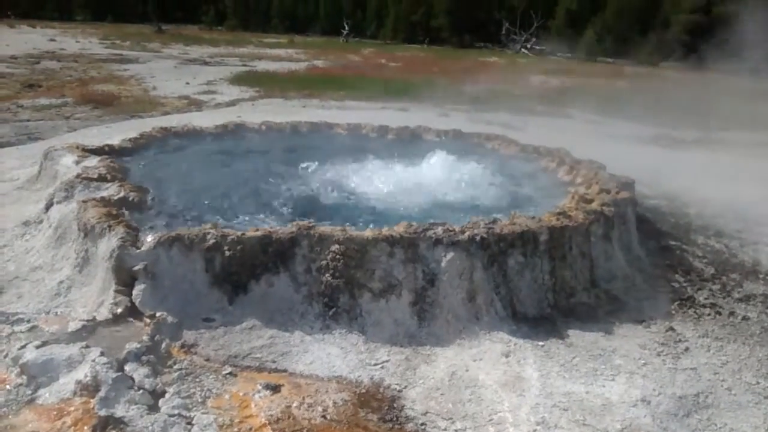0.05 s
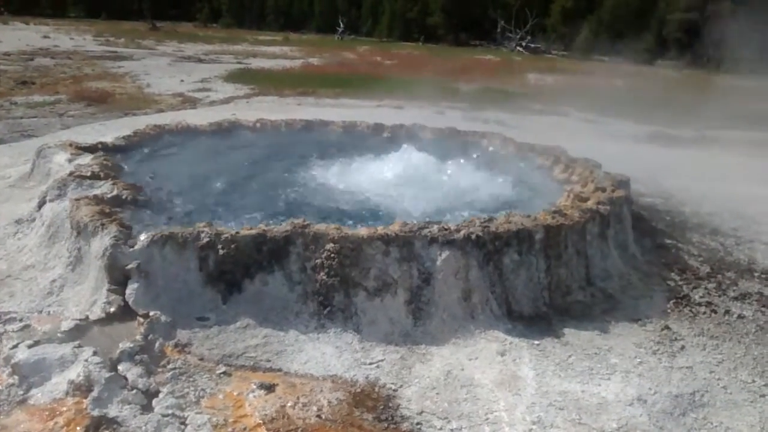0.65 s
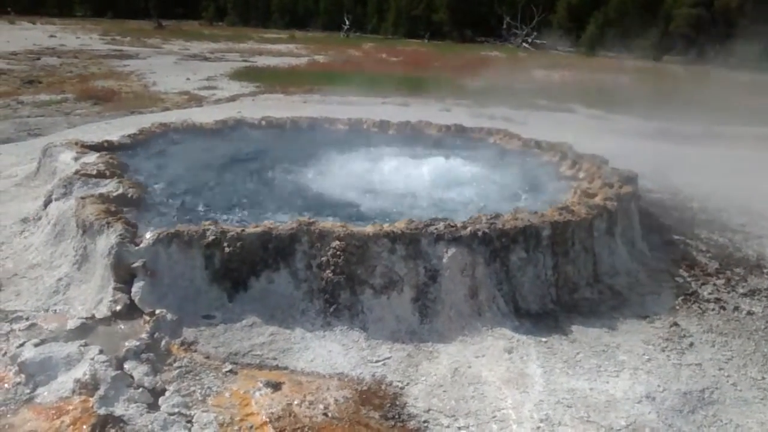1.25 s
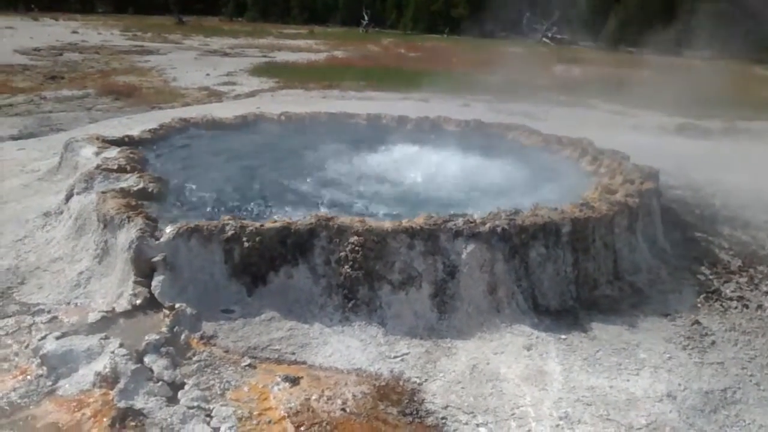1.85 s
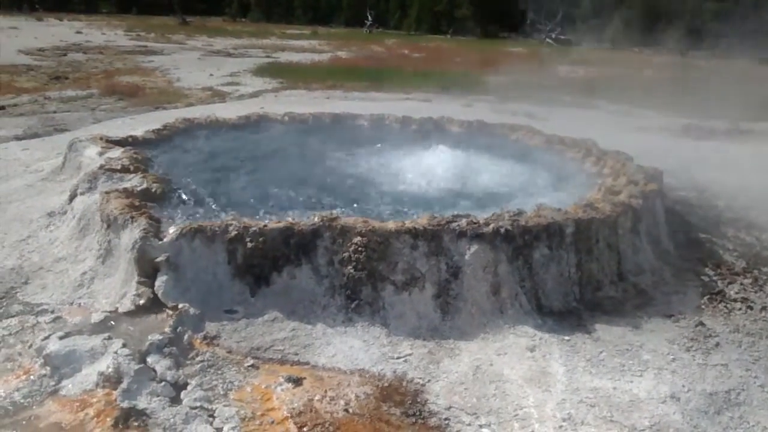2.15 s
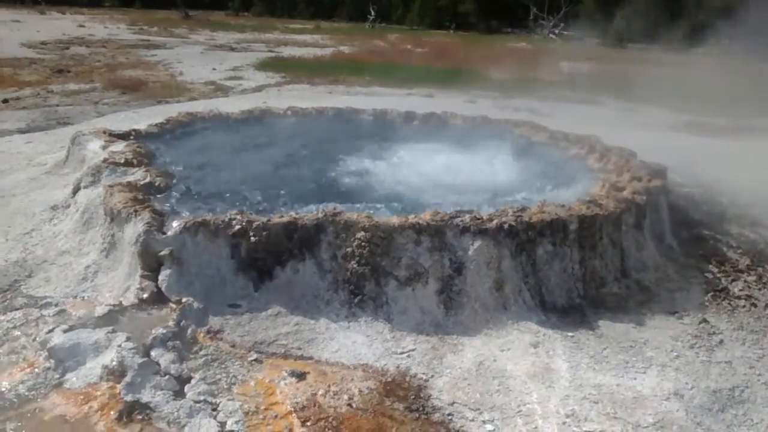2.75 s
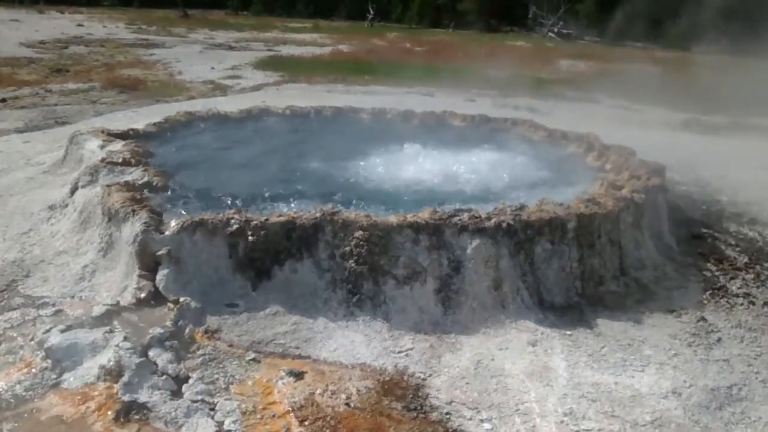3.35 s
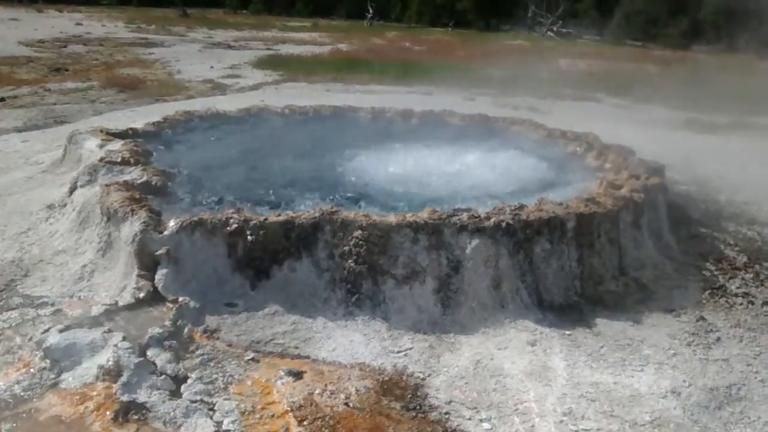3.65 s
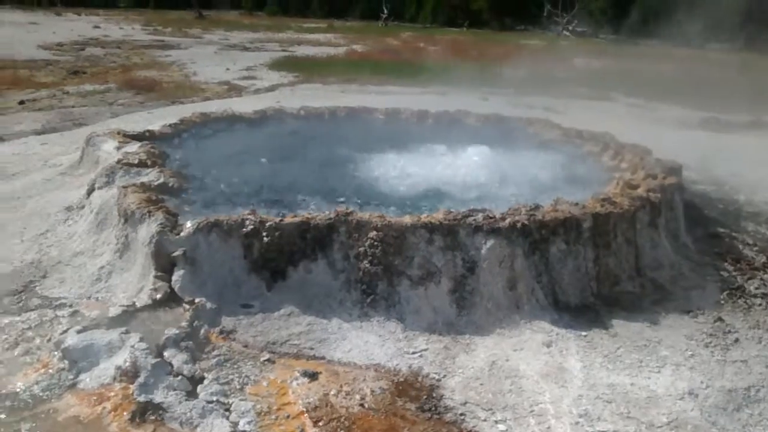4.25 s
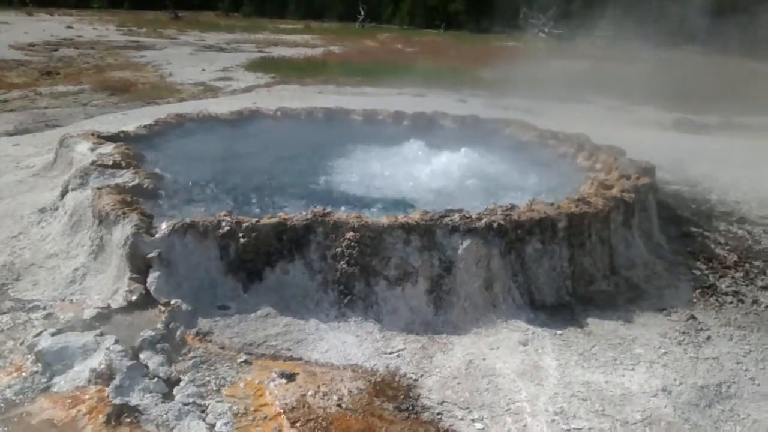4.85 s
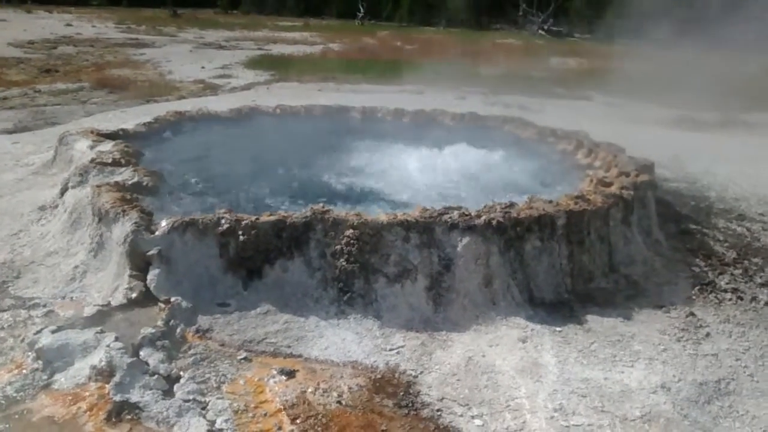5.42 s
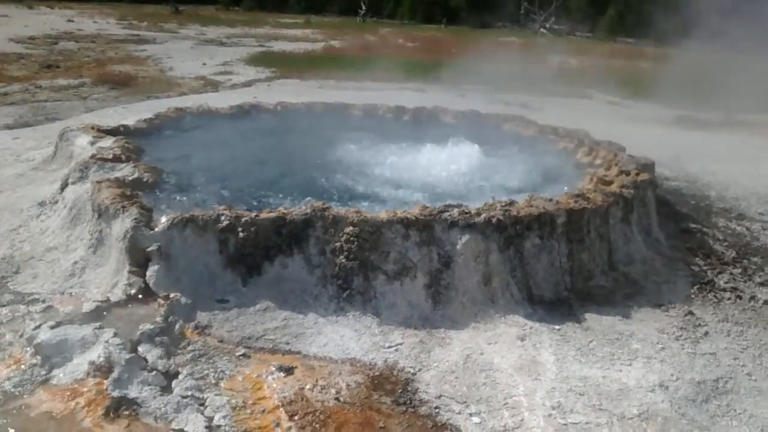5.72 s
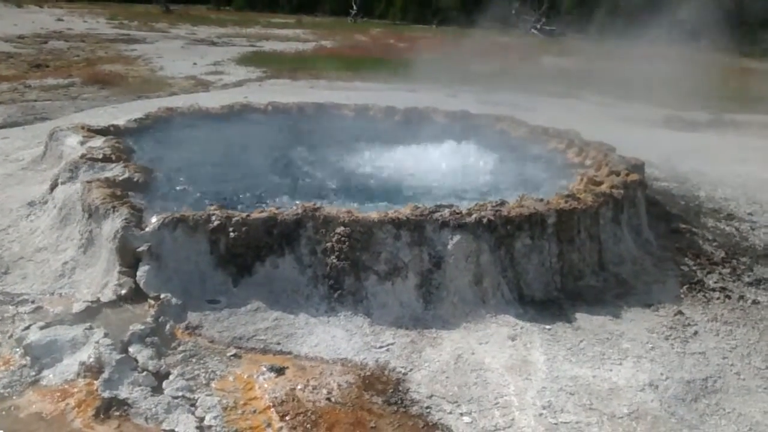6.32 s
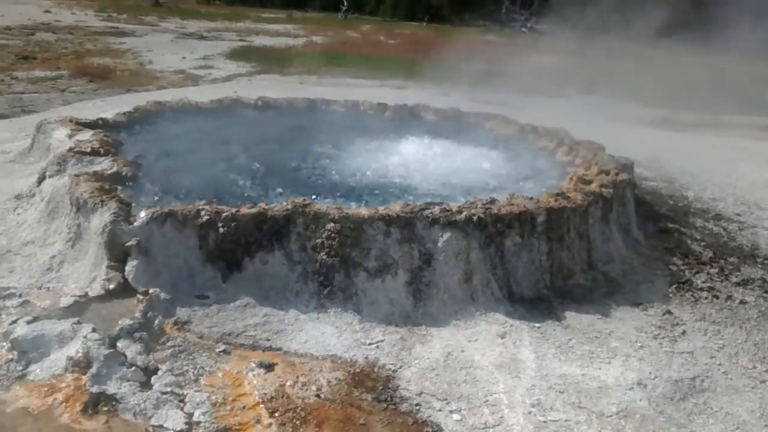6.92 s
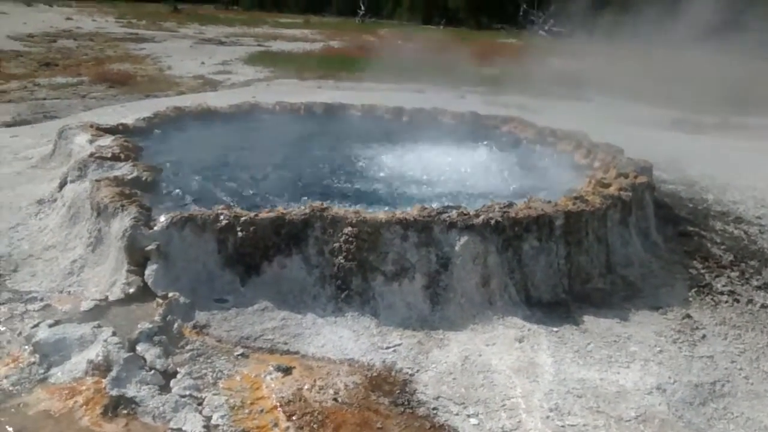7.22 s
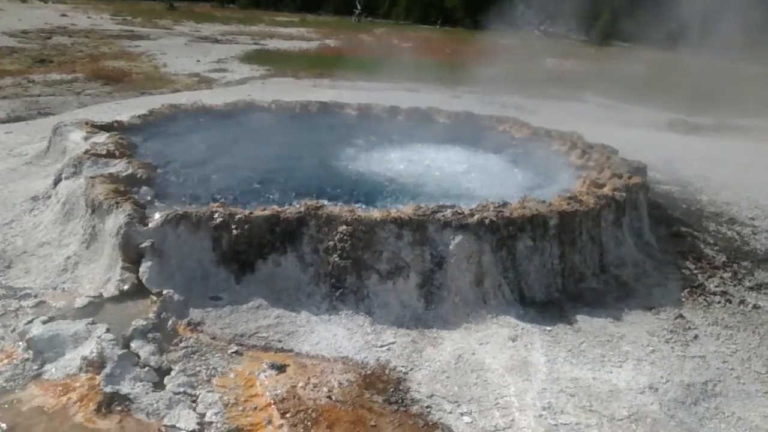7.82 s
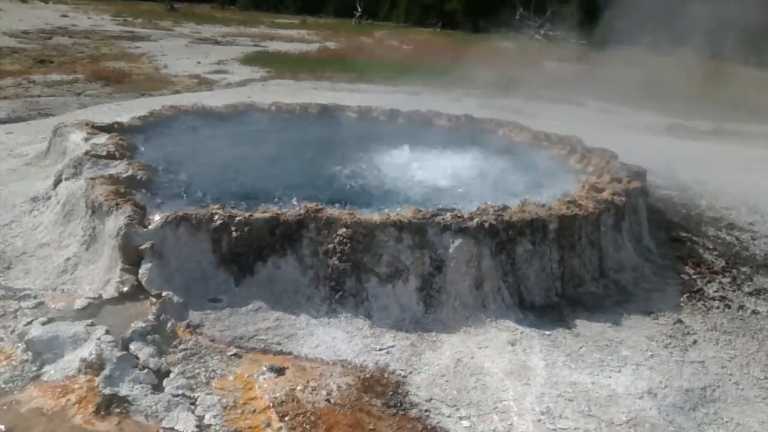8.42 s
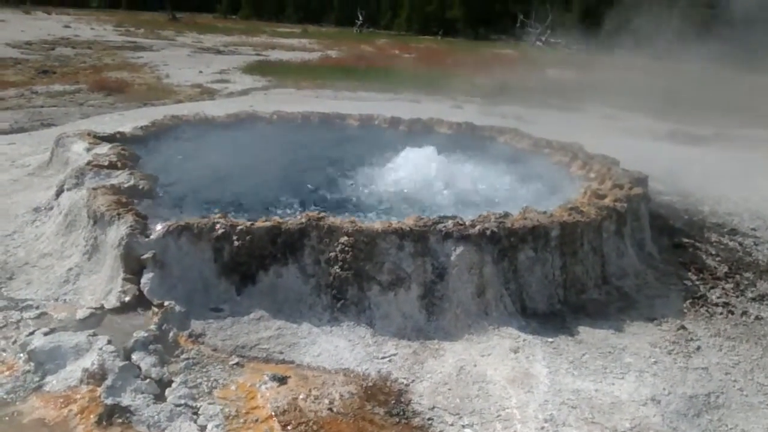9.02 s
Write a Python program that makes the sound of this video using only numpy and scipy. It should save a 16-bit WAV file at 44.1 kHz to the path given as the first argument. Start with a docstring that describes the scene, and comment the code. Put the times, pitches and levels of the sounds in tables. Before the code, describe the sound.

Wind buffets the microphone in low, ragged thumps over the churning and bubbling of a boiling pool.

```python
"""A hot spring boils in its stone basin: the water domes up, bubbles burst and spray falls back.
Wind buffets a small stereo microphone; widening gives it opposite sign in the two channels.
The hardest eddies trip the recorder's limiter, which ducks the water and lets it swell back.
A faint hiss lies underneath."""
import sys
import numpy as np
from scipy import signal
from scipy.fft import rfft, irfft, next_fast_len
from scipy.io import wavfile
from scipy.ndimage import uniform_filter1d, minimum_filter1d, map_coordinates

SR = 44100
rng = np.random.default_rng(int(sys.argv[2]) if len(sys.argv) > 2 else 0)


def generate_wav(sig):
    """Save sig (samples, or channels by samples) to the path in sys.argv[1] as 16-bit PCM at SR."""
    pcm = np.round(np.clip(np.atleast_2d(sig).T, -1, 1) * 32767).astype(np.int16)
    wavfile.write(sys.argv[1], SR, pcm)


N = 399987

# hard eddies on the microphone: time_s, strength_db, pitch_hz
EDDIES = [(.078, -12, 75), (0.091, 5, 89.5), (.473, -10, 108), (0.488, -4.5, 87), (.602, -12, 95),
          (0.851, -2, 92), (0.973, -9.5, 123), (1.405, 5, 60), (1.416, 1, 106), (1.577, -5.5, 97),
          (1.732, -0.5, 134), (1.777, -6, 101), (1.876, -11, 105), (1.906, -14, 100), (1.934, -2, 102),
          (2.141, -9.5, 96), (2.153, -2, 69.4), (2.322, -18, 135), (2.393, -6.5, 120), (2.483, -10.5, 101),
          (2.547, -11.5, 119), (2.613, 4, 54), (2.877, -6, 119), (3.693, -5.5, 79), (3.817, -13.5, 113),
          (3.86, -6, 109), (4.075, -10.5, 108), (4.159, -7, 110), (4.167, -6, 95), (4.194, 1, 125),
          (4.212, -9, 114), (4.664, -4.5, 125), (4.678, -11.5, 120), (4.749, -5, 84), (4.928, -5.5, 120),
          (4.951, -10, 120), (5.257, -1, 84), (5.331, -10, 105), (5.508, -8.5, 113), (5.65, -1.5, 131),
          (5.813, -7, 118), (5.826, -10, 109), (5.868, -2.5, 98), (5.94, -5.5, 104), (5.966, -2.5, 106),
          (6.07, -10, 119), (6.122, -10, 70), (6.147, 4, 58), (6.29, -9.5, 124), (6.346, -5, 124),
          (6.355, -8, 130), (6.58, -10, 109), (6.604, -2, 62), (6.613, 6.5, 76), (6.708, -10.5, 136),
          (6.923, -11, 130), (7.071, -15.5, 120), (7.29, -8.5, 120), (7.448, -12, 100), (7.466, -5.5, 95),
          (7.543, -8.5, 130), (7.571, -1, 122), (7.649, -14, 105), (7.664, -5.5, 100), (7.754, -5, 165),
          (7.765, -9, 70), (7.778, -3.5, 95), (7.815, -9, 120), (7.876, -10.5, 130), (7.899, -8.5, 174),
          (7.912, -4.5, 120), (7.927, -11, 100), (7.94, -0.5, 125), (7.95, -8.5, 110), (8.032, -9.5, 130),
          (8.069, -10.5, 159), (8.161, -4.5, 129), (8.177, -5, 120), (8.193, -10, 110), (8.215, 6, 116),
          (8.468, -4, 100), (8.539, -9, 105), (8.602, -10.5, 98), (8.625, -7.5, 110), (8.814, -5.5, 132),
          (8.839, -5, 120), (8.87, -7, 121), (8.979, -12.5, 120)]
# breeze under the gusts: time_s, relative_db
BREEZE = [(0.0, -48.5), (0.73, -38), (1.14, -51), (1.33, -39), (1.65, -41), (2.2, -40), (2.46, -33.5),
          (2.8, -44.5), (3.26, -55.5), (3.71, -38), (4.37, -40), (4.83, -38.5), (5.15, -35.5),
          (5.45, -46.5), (5.62, -33.5), (5.93, -35.5), (6.2, -36.5), (6.68, -42.5), (7.0, -41), (7.22, -42),
          (7.5, -34.5), (7.9, -37.5), (8.44, -38), (8.6, -32.5), (9.07, -42.5)]
SMALL_EDDY_HZ = 135


def amp(db):
    """Decibels to gain."""
    return 10 ** (np.asarray(db) / 20)


def unit(x):
    """Scale to rms 1."""
    return x / np.sqrt(np.mean(x ** 2) + 1e-20)


def along(points, hz):
    """Read (freq_hz, value) points on a log axis."""
    freq_hz, values = np.transpose(points)
    return np.interp(np.log(hz + 1), np.log(freq_hz + 1), values)


def wobble(knots_per_s):
    """Smooth random curve."""
    return map_coordinates(rng.standard_normal(4096), [np.arange(N) * knots_per_s / SR], mode="wrap")


def filtered(x, response):
    """Apply a complex frequency response."""
    size = next_fast_len(N + 8192)
    return irfft(rfft(x, size) * response(np.fft.rfftfreq(size, 1 / SR)), size)[..., :N]


def lowpass(x, cutoff_hz, order):
    """Zero-phase low-pass."""
    return filtered(x, lambda hz: 1 / (1 + (hz / cutoff_hz) ** order))


def coloured(x, spectrum):
    """Apply a (freq_hz, gain_db) spectrum."""
    return filtered(x, lambda hz: amp(along(spectrum, hz)))


def add(track, start_s, sound):
    """Mix a sound into a track."""
    i = max(0, round(start_s * SR))
    track[i:i + len(sound)] += sound[:max(0, len(track) - i)]


def swells(rows):
    """Summed power of bell-shaped swells: crest_s, peak_db, rise_s, fall_s."""
    power = np.zeros(N)
    for crest_s, db, rise_s, fall_s in rows:
        t = np.arange(max(-crest_s, -3 * rise_s), 3 * fall_s, 1 / SR)
        bell = np.exp(-(t / np.where(t < 0, rise_s, fall_s)) ** 2)
        add(power, crest_s + t[0], amp(db) ** 2 * bell)
    return power


def boil(simmer_churn_db=-46.5, simmer_spray_db=-60.5, rise_s=0.12):
    """Churn and spray levels in dB: surges over a steady simmer."""
    # the pool heaves and falls back: crest_s, churn_db, spray_db, settle_s
    surges = [(.02, -42, -58.5, .06), (.3, -45.5, -74, .05), (.74, -39.5, -52, 0.18),
              (1.07, -42, -58.5, 0.2), (1.38, -46.5, -63, 0.18), (2.5, -53.5, -61, 0.09),
              (2.95, -55, -63, .15), (3.46, -45.5, -58, 0.38), (3.75, -53, -61.5, 0.48),
              (4.15, -46.5, -61, 0.044), (4.61, -43, -54.5, 0.12), (5.06, -50, -58.5, 0.32),
              (5.68, -45, -57.5, 0.051), (5.9, -48.5, -55, 0.18), (7.22, -47, -72, 0.18),
              (8.3, -59, -72, 0.079), (8.55, -50.5, -64, 0.12), (8.9, -48.5, -59, 0.2)]
    churn = amp(simmer_churn_db) ** 2 + swells([(s, db, rise_s, fall_s) for s, db, _, fall_s in surges])
    spray = amp(simmer_spray_db) ** 2 + swells([(s, db, rise_s, fall_s) for s, _, db, fall_s in surges])
    return 10 * np.log10(churn), 10 * np.log10(spray)


def bubbles(count, low_hz, span_ratio, decay_cycles, spread_db, rise, samples):
    """Ringing bubbles; each note climbs as its bubble nears the surface."""
    when, pitch, life, strength = rng.random((count, 4)).T[:, :, None]
    hz = low_hz * (1 + (np.sqrt(span_ratio) - 1) * pitch) ** 2
    cycles = hz * np.arange(samples) / SR
    age = cycles / (decay_cycles * (.5 + life))
    gain = hz ** .75 * amp(-spread_db * np.log(np.maximum(strength, .02)))
    rings = gain * np.exp(-age) * np.sin(2 * np.pi * cycles * (1 + rise * np.minimum(age, 2)))
    index = (when * N).astype(int) + np.arange(samples)
    return unit(np.bincount(index.ravel(), rings.ravel(), N)[:N])


def froth(churn_db, spray_db):
    """Bursts and plops over a wash of small bubbles; churn drives the lows, spray the highs."""
    bursts = bubbles(9000, low_hz=393, span_ratio=22.2, decay_cycles=2.1,
                     spread_db=2.5, rise=0.053, samples=400)
    plops = bubbles(500, low_hz=527.5, span_ratio=4, decay_cycles=7.4,
                    spread_db=1, rise=0.0436, samples=1600)
    foam = rng.standard_normal(N)
    swarm = unit(bursts + amp(-14.5) * plops + amp(2.5) * foam)
    lows = lowpass(swarm, cutoff_hz=2650, order=14)
    churn = lows * amp(churn_db + 15 + 1.1 * wobble(45))
    spray = (swarm - lows) * amp(spray_db + 24.5 + 1.45 * wobble(30))
    return churn + spray


def spring(churn_db, spray_db):
    """Boiling water slightly off axis; the stone rim scatters part of its sound."""
    # water colour, mid and side: freq_hz, gain_db
    mid_colour = [(250, -2), (450, -7.5), (650, -1), (850, -3.5), (1150, -9), (1550, -8.5), (2050, -16),
                  (2300, -24.5), (2510, -40.5), (2680, -25.5), (3000, -21.5), (3520, -14), (3900, -20),
                  (4200, -23.5), (4550, -32), (5200, -26.5), (6400, -28), (14000, -67)]
    side_colour = [(100, -18), (600, -15.5), (1000, -22.5), (1350, -31), (1600, -21.5), (1850, -15),
                   (2200, -21.5), (2500, -26), (2850, -36), (3200, -23), (3900, -29), (4400, -26),
                   (6500, -37), (14000, -36)]
    # water balance: freq_hz, left_minus_right_db
    lean = [(1000, 1), (1400, -0.5), (1750, -1.5), (2150, 4.5), (2420, -6), (2540, 0), (2750, -2.5),
            (2950, -3.5), (3480, -5.5), (4000, -3), (5400, -4), (6600, 8.5), (10000, 17), (14000, 2)]
    direct, scattered = [froth(churn_db, spray_db) for _ in range(2)]
    mid = coloured(direct, mid_colour) + slaps()
    # the difference of two close capsules leads their sum by a quarter cycle
    difference = .5 * filtered(direct, lambda hz: 1j) + .87 * scattered
    side = coloured(difference, side_colour)
    stereo = np.array([mid + side, mid - side])
    return filtered(stereo, lambda hz: amp(np.outer([.5, -.5], along(lean, hz))))


def droplets(spray_db, base_db=-60.5, spurt_db=3.2, gain_db=-8.5):
    """Fine drops rain on the pool in spurts, louder when the spray is high."""
    drops = rng.standard_normal((2, N)) * amp(3.5 * wobble(300))
    fizz = unit(coloured(drops, [(3000, -30), (5200, 2.5), (7000, -3), (9000, -3), (14000, -22)]))
    spurts = unit(amp(spurt_db * wobble(28)))
    return fizz * spurts * amp((spray_db + base_db) / 2 + gain_db)


def hiss():
    """Faint steady noise, independent per channel."""
    # hiss colour: freq_hz, gain_db
    colour = [(100, -25), (2500, 8), (4500, 2.5), (9000, 0), (12000, 0.6), (15500, -0.5)]
    return amp([[-60.1], [-60.6]]) * coloured(rng.standard_normal((2, N)), colour)


def airflow(breeze_gain_db=16.5, sway_db=2.5):
    """Wind level in dB: swaying breeze, soft gusts and a rush peaking just before each hard eddy."""
    # soft gusts: crest_s, peak_db, half_length_s
    gusts = [(0.068, -16.5, 0.04), (0.23, -18, 0.022), (0.335, -16, 0.014), (.625, -15.5, 0.033),
             (0.757, -18.5, 0.027), (0.994, -22, 0.033), (1.23, -14, 0.039), (1.5, -15, 0.037),
             (1.907, -11.5, 0.031), (2.28, -20, 0.074), (2.59, -13, 0.013), (2.927, -17.5, 0.022),
             (3.225, -19.5, 0.031), (3.506, -21.5, 0.059), (3.647, -15, 0.014), (3.81, -15.5, 0.028),
             (4.433, -18.5, 0.021), (5.004, -19, 0.038), (5.21, -17.5, 0.019), (5.331, -18, 0.021),
             (6.256, -12.5, 0.032), (6.39, -17, 0.05), (6.818, -13.5, 0.037), (6.982, -18, 0.03),
             (7.087, -17, 0.02), (7.438, -7, 0.014), (7.648, -13, 0.041), (8.356, -13, 0.038),
             (8.56, -19, 0.055), (8.92, -16.5, 0.09)]
    breeze_db = np.interp(np.arange(N) / SR, *np.transpose(BREEZE))
    power = amp(breeze_db + breeze_gain_db + sway_db * wobble(14)) ** 2
    power += swells([(s, db, half_s, half_s) for s, db, half_s in gusts])
    lead_s, rise_s, fall_s = 0.0053, 0.02, 0.018
    power += swells([(s - lead_s, 0.7 * db - 19, rise_s, fall_s) for s, db, _ in EDDIES])
    return 10 * np.log10(power)


def turbulence(wind_db, lumps_db, split_hz, treble_db_per_db):
    """Whirls patter over a smooth roar; faster air sheds finer ones and sounds brighter."""
    # turbulence at the microphone: freq_hz, gain_db
    buffet = [(8, -8.5), (25, 8), (90, 3), (170, -4.5), (260, -12.5), (350, -22.5), (480, -29.5),
              (620, -49), (900, -51), (2000, -41)]
    whirls_per_s = 260
    level_db = wind_db + lumps_db * wobble(60)
    whirls = unit((rng.random(N) < whirls_per_s / SR) * rng.standard_normal(N))
    patter = filtered(whirls, lambda hz: 1j)
    air = unit(coloured(patter + 0.74 * rng.standard_normal(N), buffet))
    lows = lowpass(air, split_hz, order=4)
    treble_db = treble_db_per_db * np.minimum(level_db + 19.5, 4)
    pressure = amp(level_db) * (lows + (air - lows) * amp(treble_db))
    # pressure saturates; the port passes only lows
    return lowpass(.6 * np.tanh(pressure / .6), cutoff_hz=1200, order=8)


def wind(shelter_db=-20):
    """The right capsule faces the wind; the left is sheltered."""
    wind_db = airflow()
    right = turbulence(wind_db, lumps_db=2.5, split_hz=190, treble_db_per_db=0.97) + eddies()
    left = amp(shelter_db) * turbulence(wind_db, lumps_db=6, split_hz=200, treble_db_per_db=0.33)
    return np.array([left, right])


def eddies(skew_rad=1.1, flurry_db=-23.5, lead_s=0.0028, decay_s=0.0069):
    """Pressure builds in a flurry of whirls, then snaps to suction as each eddy tears off."""
    thumps, flurry = np.zeros(N), np.zeros(N)
    t = np.arange(-2048, 2048) / SR
    envelope = np.exp(-np.abs(t + lead_s) / decay_s)
    for time_s, db, hz in EDDIES + companions() + strays():
        pulse = np.real(np.exp(-1j * skew_rad) / (1 + 2j * np.pi * hz * t) ** 2)
        add(thumps, time_s + t[0], amp(db) * pulse)
        add(flurry, time_s + t[0], amp(db + flurry_db) * envelope)
    colour = [(40, 11), (150, 4.5), (300, 6.5), (480, -6.5), (800, -14), (1500, -47)]
    whirls = unit(coloured(rng.standard_normal(N), colour))
    return lowpass(thumps + flurry * whirls, cutoff_hz=1050, order=6)


def companions(within_s=.02, gain_db=-7.5):
    """Each hard eddy sheds a smaller one just before or after it: a ragged thump."""
    offsets, detunes = 2 * rng.random((len(EDDIES), 2)).T - 1
    return [(s + within_s * offset, min(db, -2) + gain_db, SMALL_EDDY_HZ * 2 ** (detune / 2))
            for (s, db, _), offset, detune in zip(EDDIES, offsets, detunes)]


def strays(count=70, gain_db=20, spread_db=4):
    """Weak eddies at random times; their strength follows the breeze."""
    when, force, pitch = rng.random((count, 3)).T
    time_s = when * N / SR
    strength_db = np.interp(time_s, *np.transpose(BREEZE)) + gain_db + spread_db * (2 * force - 1)
    return list(zip(time_s, strength_db, SMALL_EDDY_HZ * 2 ** (pitch - .5)))


def slaps(t60_s=0.025, gain_db=-2.5):
    """Falling water lands with a short wet burst."""
    # lumps and drops hitting the pool: time_s, level_db, pitch_hz
    landings = [(.634, -33.5, 3600), (.707, -45, 5860), (.716, -32, 800), (0.737, -40, 3570),
                (.76, -33, 930), (0.774, -30, 1470), (.798, -43, 845), (.803, -52, 5400), (.83, -41, 740),
                (0.842, -39.5, 3650), (0.875, -31, 940), (.9, -45, 3570), (1.169, -35, 840),
                (1.571, -34, 1610), (1.843, -36, 1720), (2.022, -45, 5600), (2.452, -40, 1380),
                (2.575, -46.5, 7100), (2.931, -52, 7500), (2.972, -45, 5600), (3.055, -48, 6800),
                (3.167, -36.5, 1470), (3.41, -48, 5800), (3.417, -31.5, 1720), (3.465, -30, 1330),
                (3.856, -51, 8300), (4.018, -49, 8500), (4.204, -49, 7800), (4.399, -30, 716),
                (4.601, -26.5, 760), (4.95, -50, 6800), (5.025, -38, 1300), (5.046, -48, 5700),
                (5.316, -49, 6400), (5.85, -34, 1780), (6.008, -44, 5430), (7.566, -37, 3270),
                (7.756, -38, 1490), (8.316, -31.5, 1370)]
    track, t = np.zeros(N), np.arange(2048) / SR
    for time_s, db, hz in landings:
        band = signal.butter(3, [hz * .87, hz * 1.15], "band", fs=SR, output="sos")
        burst = signal.sosfilt(band, rng.standard_normal(len(t)) * amp(-60 * t / t60_s))
        add(track, time_s - .001, amp(db + gain_db) * burst / np.abs(burst).max())
    return track


def widened(capsules, delay_s=.00039):
    """Subtract a delayed share of each capsule from the other channel."""
    # crossfeed: freq_hz, share
    crossfeed = [(600, .64), (2500, 0.96), (5000, 0.18), (8000, 0.14), (15000, 0.08)]
    bleed = filtered(capsules[::-1], lambda hz: along(crossfeed, hz) * np.exp(-2j * np.pi * hz * delay_s))
    return capsules - bleed


def limiter(x, ceiling_db, hold_s, release_db_per_s):
    """Peaks over the ceiling cut the gain at once; it holds, then creeps back."""
    over_db = np.maximum(20 * np.log10(np.abs(x).max(0) + 1e-9) - ceiling_db, 0)
    half_hold = int(hold_s * SR) // 2
    held_db = -minimum_filter1d(-over_db, 2 * half_hold + 1, origin=half_hold)
    recovery_db = release_db_per_s * np.arange(N) / SR
    cut_db = np.maximum.accumulate(held_db + recovery_db) - recovery_db
    smooth_gain_db = uniform_filter1d(minimum_filter1d(-cut_db, size=129), size=129)
    return x * amp(smooth_gain_db)


def scene():
    """Boiling water with widened droplets, wind and hiss."""
    churn_db, spray_db = boil()
    fizz = hiss() + droplets(spray_db)
    return spring(churn_db, spray_db) + widened(fizz + wind())


def record(dry):
    """The recorder limits peaks and bandwidth."""
    top_hz = 15550
    limited = limiter(dry, ceiling_db=-.9, hold_s=0.072, release_db_per_s=12.5)
    return filtered(limited, lambda hz: hz < top_hz)


dry = scene()
out = record(dry)
generate_wav(out)
```